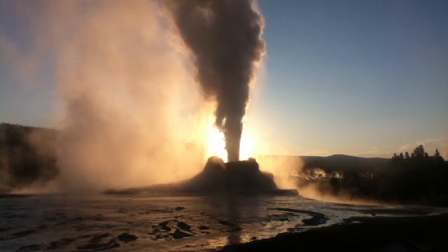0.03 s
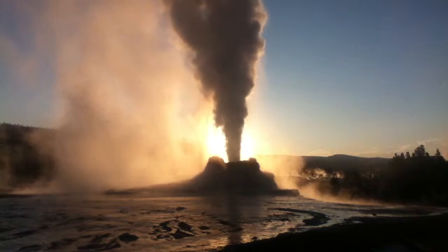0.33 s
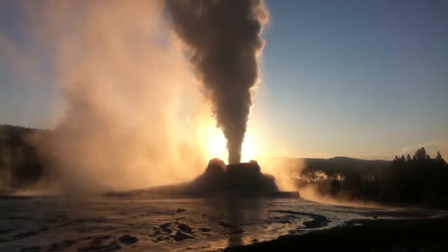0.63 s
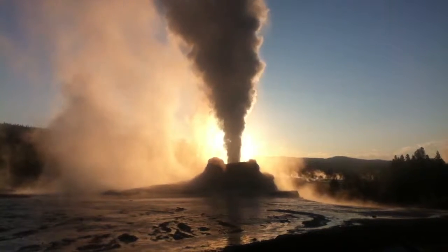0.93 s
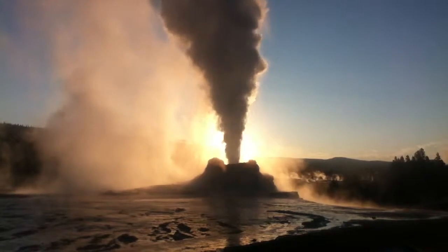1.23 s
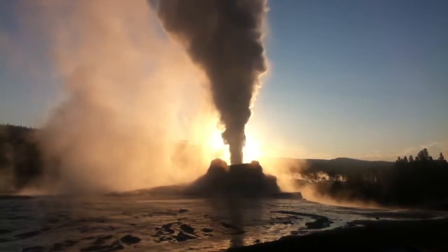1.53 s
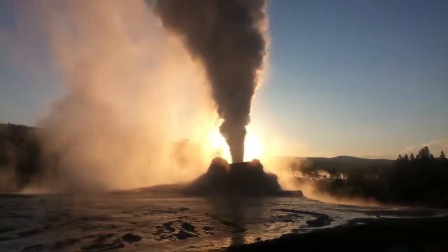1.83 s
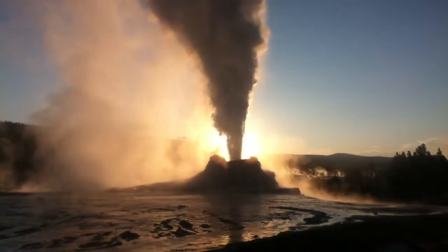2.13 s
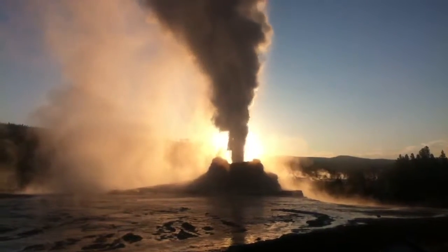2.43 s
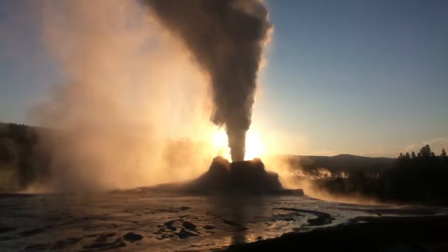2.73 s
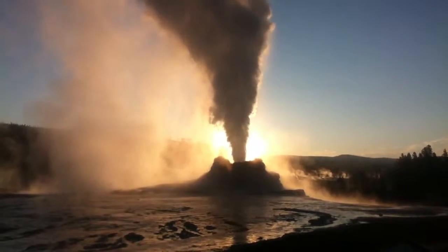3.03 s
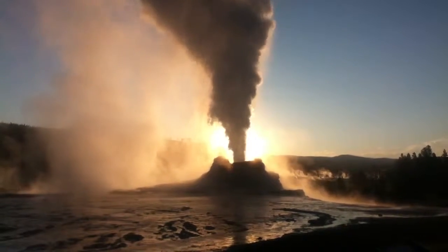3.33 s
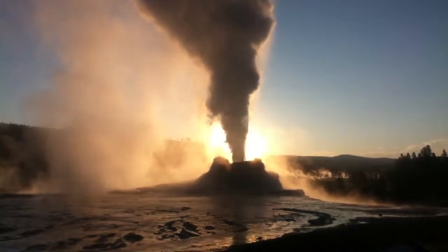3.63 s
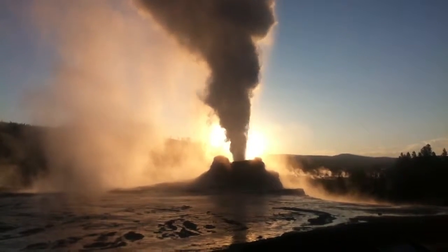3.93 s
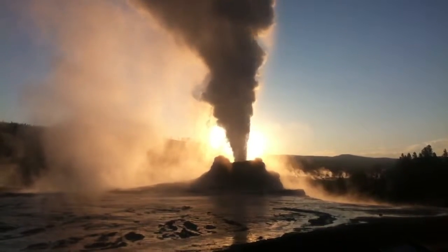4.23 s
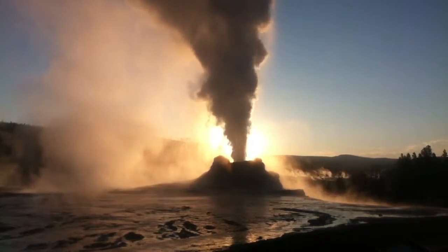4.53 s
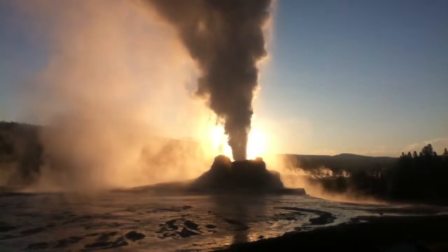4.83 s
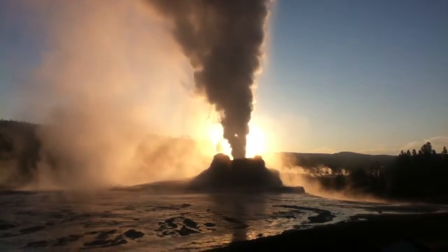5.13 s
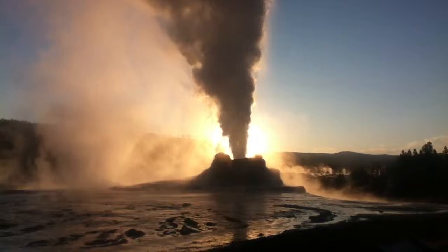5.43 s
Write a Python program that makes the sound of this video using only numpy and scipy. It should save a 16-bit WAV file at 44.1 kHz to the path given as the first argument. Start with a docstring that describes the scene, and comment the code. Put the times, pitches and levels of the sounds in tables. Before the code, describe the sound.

Heard from across flat, wet ground, a geyser gives off a continuous, slightly hollow roar and hiss of steam over a low, churning rumble. Uneven thumps pulse through the rumble several times a second, and the jet surges gently with a few throaty puffs. Fine spray hisses faintly throughout, and a single drop ticks on stone near the microphone toward the end.

```python
"""A deep, chugging rumble under a roar of steam: a geyser heard across a flat, wet sinter terrace.
Pressure swells in the throat of the cone, which rumbles in a few broad resonances and thumps as slugs
of water burst through. The steam jet above it roars, rasps and hisses with the flow, and fine spray
falls. The ground reflection hollows the roar, and one drop ticks close by."""
import sys
import numpy as np
from scipy import signal
from scipy.fft import rfft, irfft
from scipy.io import wavfile
from scipy.ndimage import uniform_filter1d

SR = 44100
rng = np.random.default_rng(int(sys.argv[2]) if len(sys.argv) > 2 else 0)


def master(y):
    """Save y as 16-bit WAV."""
    cut = np.clip(np.atleast_2d(y).T, -1, 1)
    pcm = np.round(cut * 32767)  # scale
    wavfile.write(sys.argv[1], SR, pcm.astype(np.int16))


N = 251370

# pressure in the throat, as a fader ride on the rumble: time_s, level_db
THROAT_PRESSURE = [(0.1, -38), (0.46, -38), (0.62, -35.5), (0.85, -34), (1.42, -37.5), (1.74, -40),
                   (2.04, -38), (2.18, -34.5), (2.55, -33), (2.9, -32), (3.3, -34.5), (3.9, -36),
                   (4.4, -33.5), (4.6, -34.5), (4.74, -36), (5.26, -34), (5.38, -36), (5.7, -34)]
# broad resonances of the throat: pitch_hz, width_hz, level_db
THROAT_MODES = [(53.3, 28, -4.5), (83.6, 26, -2.5), (113.6, 35.7, 0.5), (162.3, 36, -3.5),
                (245.3, 45, -11.5)]
# their pitch bend as the water level shifts: time_s, pitch_ratio
THROAT_BEND = [(0.1, 1.0), (1.2, .94), (2.2, 1.05), (2.75, .94), (3.7, .96), (4.3, 1.1), (4.6, 1.02),
               (5.1, 1.01), (5.5, 1.1)]
# slugs of water bursting through the throat: peak_s, lift_db, pitch_hz
THUMPS = [(.155, 5.5, 121), (.312, 3, 133.8), (.638, 4, 122.7), (.771, 3.5, 108), (.812, 1.5, 139.4),
          (.915, 5.5, 111), (1.055, 4.5, 121), (1.197, 6, 129), (1.407, 7, 122.8), (1.537, 5, 104.3),
          (1.621, 1.5, 116), (1.988, 5.5, 136.8), (2.189, 3.5, 136), (2.245, 6, 109), (2.387, 5, 120),
          (2.623, 6.5, 132), (2.71, 7, 114), (2.783, 8.5, 113), (2.876, 2.5, 180), (2.975, 5, 125),
          (3.134, 5.5, 108.2), (3.327, 6.5, 124.7), (3.497, 7.5, 106), (3.637, 3, 119), (3.811, 5.5, 134),
          (4.232, 3, 119), (4.303, 3.5, 136), (4.35, 3.5, 145), (4.443, 8.5, 127), (4.485, 5.5, 110.7),
          (4.575, 5, 122), (4.621, 8.5, 122), (4.716, 3, 141), (4.885, 8, 117), (4.975, 7, 123.6),
          (5.075, 8.5, 121), (5.18, 2.5, 131), (5.249, 7, 121.7), (5.581, 5, 126)]
# brief dips in the rumble between chugs: time_s, dip_db
LULLS = [(.22, -1), (.725, -5), (1.018, -7), (1.505, -5), (1.59, -2.5), (2.06, -2.5), (2.288, -4.5),
         (2.925, -6), (3.064, -3), (3.361, -2.5), (3.857, -5), (4.18, -6), (4.268, -4), (4.74, -5),
         (5.137, -5)]
# steam flow out of the cone, as a fader ride around its mean: time_s, level_db
STEAM_FLOW = [(0.1, -41), (0.64, -42), (0.8, -39.2), (1.35, -40.5), (1.7, -41.5), (1.88, -42),
              (2.15, -40.5), (2.54, -38), (2.85, -39.5), (3.02, -39.4), (3.38, -40.5), (3.77, -43.5),
              (3.98, -40.5), (4.58, -40), (5.05, -43), (5.22, -42), (5.36, -43.5), (5.7, -42)]
# tone colour of the turbulence in the plume: frequency_hz, level_db
PLUME_COLOUR = [(300, -3), (410, -2.5), (475, -0.5), (610, 2), (780, -4), (1000, -2.5), (1400, -2),
                (1700, -3), (2300, -1), (2800, -4.5), (3150, -9)]
# tone colour of the turbulence at the mouth of the cone: frequency_hz, level_db
MOUTH_COLOUR = [(1470, -34), (2500, 11.5), (3150, -3.5), (4120, -4), (5030, -8), (5690, -7), (6640, -13.5),
                (7450, -14), (12500, -28), (15700, -38)]
# throaty puffs on top of the roar: peak_s, lift_db
PUFFS = [(.765, 3), (.845, 2), (2.87, 2.5), (2.995, 3.8), (3.055, 3.2), (4.31, 2.7), (4.38, 3), (4.87, 3.5),
         (5.08, 3.5)]
# flare-ups of the rasp: peak_s, lift_db
RASP_FLARES = [(.77, 5.5), (1.07, 1.5), (1.33, 0), (1.73, 5.5), (2.98, 2)]
# tone colour of the falling spray: frequency_hz, level_db
SPRAY_COLOUR = [(4000, -20), (7000, -1.5), (9500, -1), (12500, -6), (15700, -12.5)]
# a drop landing close by: start_s, peak_db
DROPS = [(4.6252, -24)]

THUMP_RISE_S, THUMP_FALL_S = 0.0096, 0.013
TIME_S = np.arange(N) / SR


def throat(pressure_db, low_hz=35, high_hz=282, trim_db=-0.32, duck_db_per_db=0.4):
    """Churning steam rings the throat; its resonances wander as water sloshes, and slugs add thumps."""
    modes = sum(from_db(db) * resonance(rng.standard_normal(N), hz, width_hz)
                for hz, width_hz, db in THROAT_MODES)
    sloshing = wander(modes, depth=0.0496, rate_hz=3.94, bend=automation(THROAT_BEND))
    rumble = cut(cut(sloshing, low_hz, "high", order=3), high_hz, "low", order=10)
    lull_db = swells_db(LULLS, rise_s=0.017, fall_s=0.017)
    churn = steady(rumble, window_s=0.041) * from_db(lull_db)
    # each slug displaces the churn, ducking it under the thump
    duck_db = duck_db_per_db * swells_db(THUMPS, THUMP_RISE_S, THUMP_FALL_S)
    return from_db(pressure_db + trim_db) * (churn * from_db(-duck_db) + thumps())


def thumps(waver_depth=0.14, waver_hz=50.3):
    """Each slug sets the throat swinging for a few cycles at a wavering pitch of its own."""
    wavering_s = np.cumsum(1 + waver_depth * drift(waver_hz)) / SR
    out = np.zeros(N)
    for peak_s, lift_db, pitch_hz in THUMPS:
        near = np.abs(TIME_S - peak_s) < .1
        lift = from_db(lift_db * swell(TIME_S[near] - peak_s, THUMP_RISE_S, THUMP_FALL_S))
        envelope = np.sqrt(2 * np.abs(lift ** 2 - lift ** -2))
        phase = rng.uniform(0, 2 * np.pi)
        out[near] += envelope * np.sin(2 * np.pi * pitch_hz * wavering_s[near] + phase)
    return out


def steam_jet(surge_db, pressure_db, low_hz=300, roar_top_hz=800, hiss_top_hz=3100, flutter_db=0.69):
    """Big eddies in the plume roar, smaller ones hiss, the finest sizzle at the mouth; all flutter."""
    puff_db = swells_db(PUFFS, rise_s=0.043, fall_s=0.029)
    # each band's fader: a resting level, plus a share of whatever drives it
    roar_db = -47.5 + 0.41 * surge_db + 0.37 * (pressure_db - pressure_db.mean())
    hiss_db = -43.5 + 0.68 * surge_db
    sizzle_db = -46.5 + 0.97 * surge_db + 0.2 * puff_db
    roar = cut(ground_bounce(coloured_noise(PLUME_COLOUR)), [low_hz, roar_top_hz], "band", order=5)
    hiss = cut(ground_bounce(coloured_noise(PLUME_COLOUR)), [roar_top_hz, hiss_top_hz], "band", order=8)
    sizzle = cut(coloured_noise(MOUTH_COLOUR), hiss_top_hz, "high", order=12)
    puff = steady(hollow_noise(pitch_hz=530, width_hz=310), window_s=0.04)
    puff_gain = np.sqrt(np.abs(from_db(puff_db) ** 2 - 1))   # just enough to lift the roar by puff_db
    eddies = (from_db(roar_db) * (steady(roar, window_s=0.18) + puff_gain * puff)
              + from_db(hiss_db) * steady(hiss, window_s=0.2)
              + from_db(sizzle_db) * rms_one(sizzle))
    return eddies * from_db(flutter_db * drift(rate_hz=20))


def ground_bounce(x, delay_s=0.002043, echo_db=-17, top_hz=1600):
    """A dull echo off the terrace trails the direct sound and comb-filters it."""
    echo = np.interp(TIME_S - delay_s, TIME_S, cut(x, top_hz, "low", order=1))
    return x + from_db(echo_db) * echo


def lip_rasp(surge_db):
    """The lip of the cone gives the jet a hollow, wavering edge that flares now and then."""
    edge = wander(hollow_noise(pitch_hz=2250, width_hz=660), depth=.025, rate_hz=3)
    level_db = -52 + 0.97 * surge_db + swells_db(RASP_FLARES, rise_s=0.089, fall_s=0.054)
    return from_db(level_db) * steady(edge, window_s=0.045)


def close_drop(low_hz=2700, high_hz=5900):
    """A drop on stone is one sharp tick that dies within a cycle or two."""
    impacts = np.zeros(N)
    for start_s, peak_db in DROPS:
        impacts[round(start_s * SR)] = from_db(peak_db)
    tick = cut(signal.unit_impulse(SR // 100), [low_hz, high_hz], "band", order=4)
    return np.convolve(impacts, tick / np.abs(tick).max())[:N]


def spray(surge_db):
    """Fine spray falls back as a thin, even bed of hiss that hardly follows the surges."""
    return from_db(-60 + 0.25 * surge_db) * rms_one(coloured_noise(SPRAY_COLOUR))


def coloured_noise(colour):
    """White noise through a drawn EQ curve."""
    points_hz, points_db = np.transpose(colour)
    hz = np.fft.rfftfreq(N, 1 / SR) + 1
    gain = from_db(np.interp(np.log(hz), np.log(points_hz), points_db))
    return irfft(rfft(rng.standard_normal(N)) * gain, N)


def hollow_noise(pitch_hz, width_hz):
    """White noise sent twice through one resonance."""
    return resonance(resonance(rng.standard_normal(N), pitch_hz, width_hz), pitch_hz, width_hz)


def resonance(x, hz, width_hz):
    """Two-pole resonator with unity gain at its peak."""
    radius = np.exp(-np.pi * width_hz / SR)
    feedback = [1, -2 * radius * np.cos(2 * np.pi * hz / SR), radius ** 2]
    return signal.lfilter(np.array([1, 0, -1]) * (1 - radius ** 2) / 2, feedback, x)


def cut(x, hz, kind, order):
    """Butterworth filter; kind names the part that passes."""
    return signal.sosfilt(signal.butter(order, hz, kind, fs=SR, output="sos"), x)


def wander(x, depth, rate_hz, bend=1):
    """Varispeed: every pitch follows the bend and drifts around it; the length stays the same."""
    position = np.cumsum(bend + depth * drift(rate_hz))
    return np.interp(position * N / position[-1], np.arange(N), x)


def drift(rate_hz):
    """Smooth random modulation at rms 1."""
    hz = np.fft.rfftfreq(N, 1 / SR)
    return rms_one(irfft(rfft(rng.standard_normal(N)) / (1 + (hz / rate_hz) ** 2), N))


def steady(x, window_s):
    """Leveller: holds the power near 1 over the window and lets faster flutter through."""
    size = int(window_s * SR)
    power = uniform_filter1d(uniform_filter1d(x ** 2, size), size)
    return x / np.sqrt(np.abs(power) + 1e-20)


def swell(from_peak_s, rise_s, fall_s):
    """Bell-shaped envelope with its own rise and fall."""
    return np.exp(-(from_peak_s / np.where(from_peak_s < 0, rise_s, fall_s)) ** 2)


def swells_db(events, rise_s, fall_s):
    """A fader curve with one smooth bump or dip per event."""
    return sum(db * swell(TIME_S - peak_s, rise_s, fall_s) for peak_s, db, *_ in events)


def automation(points):
    """Straight ramps between breakpoints."""
    return np.interp(TIME_S, *np.transpose(points))


def from_db(db):
    """Decibels to gain."""
    return 10 ** (db / 20)


def rms_one(x):
    """Scale to rms 1."""
    return x / np.sqrt(np.mean(x ** 2) + 1e-20)


def scene():
    """The geyser stands dead centre; both channels carry the same mix."""
    pressure_db, flow_db = automation(THROAT_PRESSURE), automation(STEAM_FLOW)
    surge_db = flow_db - flow_db.mean()
    rumble = throat(pressure_db)
    steam = steam_jet(surge_db, pressure_db) + lip_rasp(surge_db)
    geyser = rumble + steam + close_drop() + spray(surge_db)
    return np.stack([geyser, geyser])


def record(dry, start_s=.084, top_hz=15700):
    """The sound cuts in hard, and a steep low-pass shaves off the very top."""
    low_pass = signal.ellip(12, .1, 80, top_hz, fs=SR, output="sos")
    return signal.sosfilt(low_pass, dry * (TIME_S >= start_s))


dry = scene()
out = record(dry)
master(out)
```